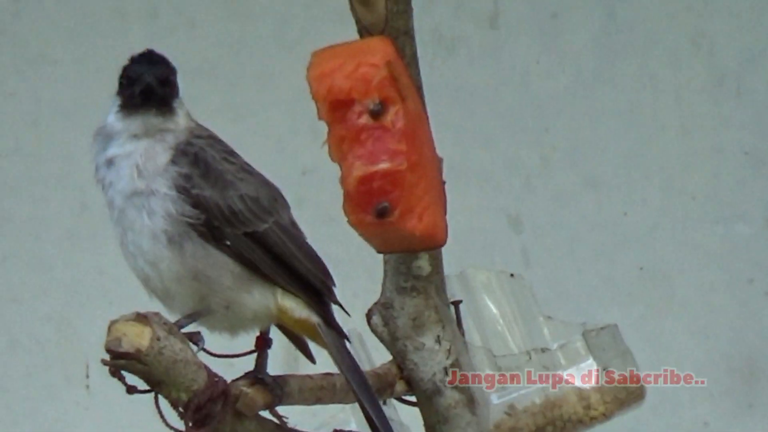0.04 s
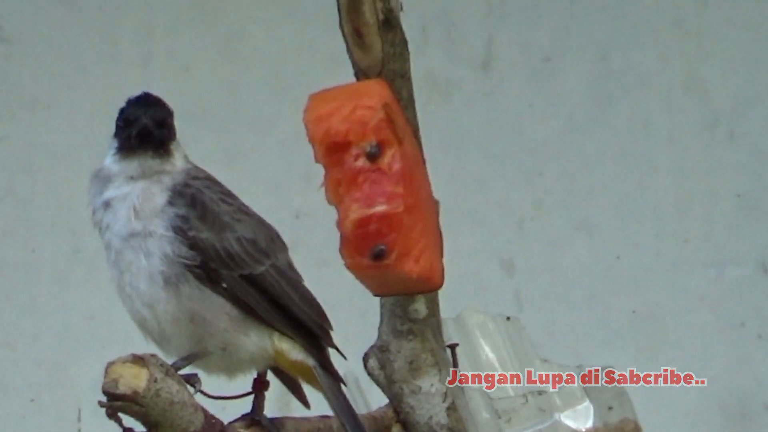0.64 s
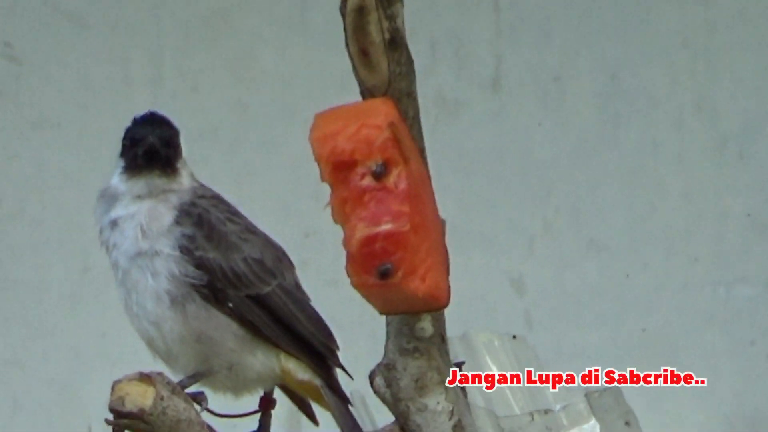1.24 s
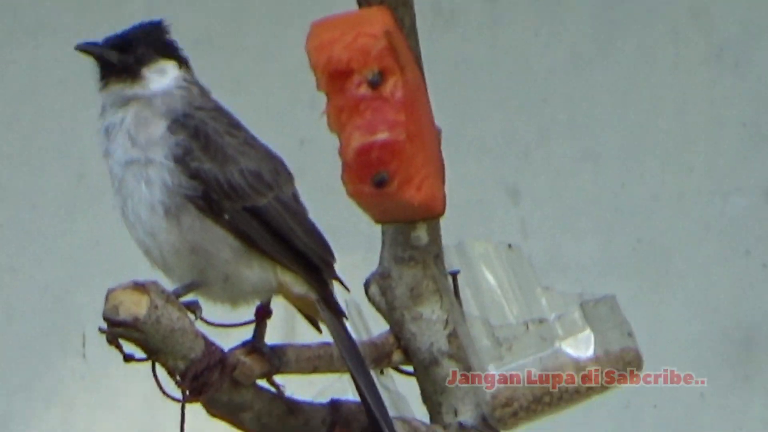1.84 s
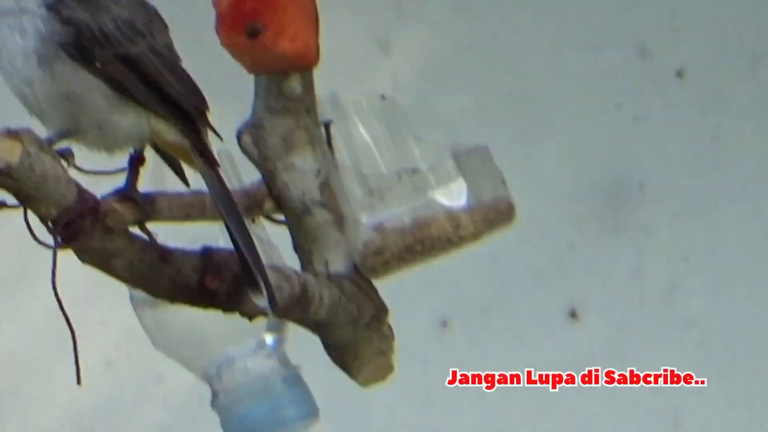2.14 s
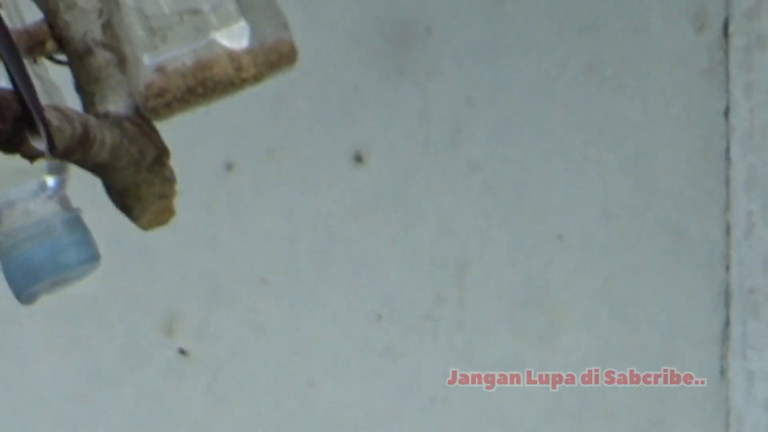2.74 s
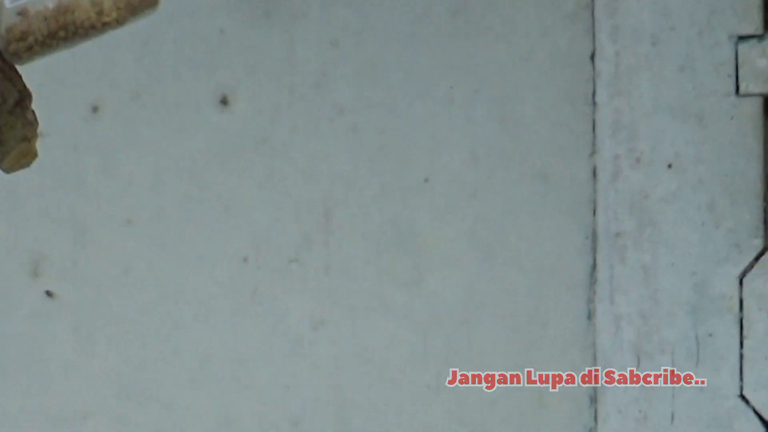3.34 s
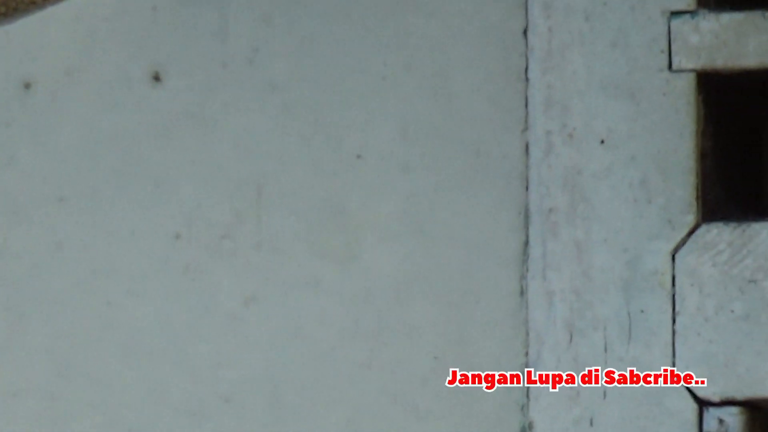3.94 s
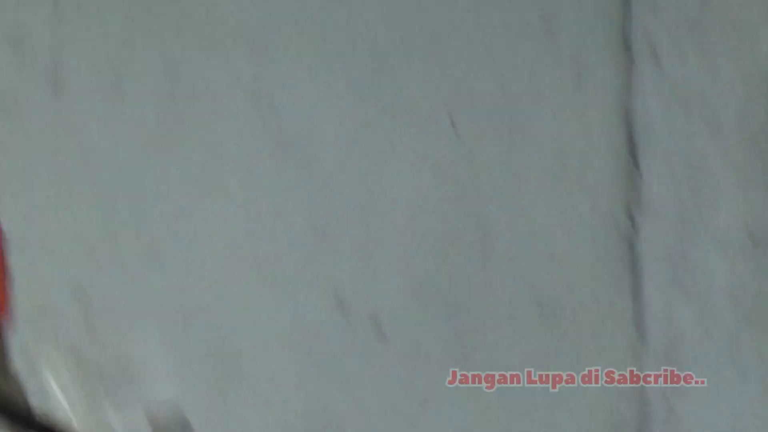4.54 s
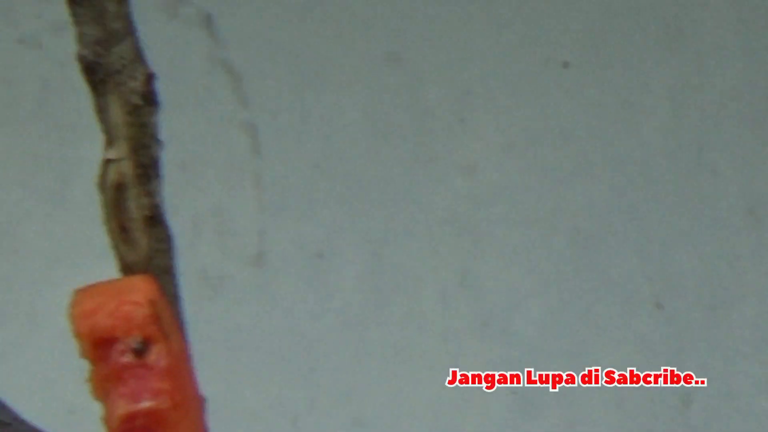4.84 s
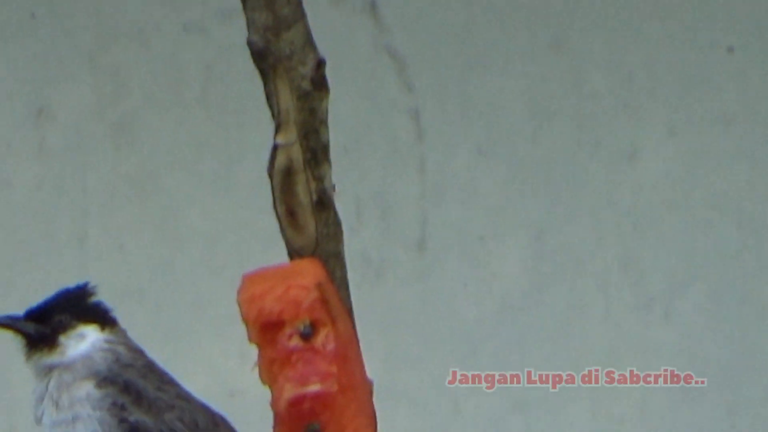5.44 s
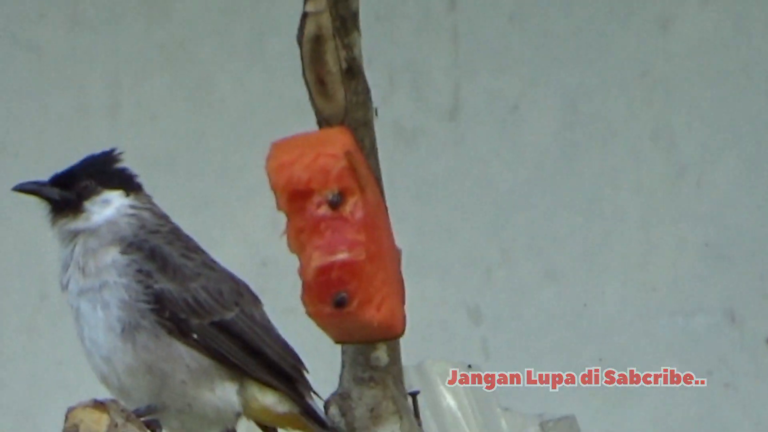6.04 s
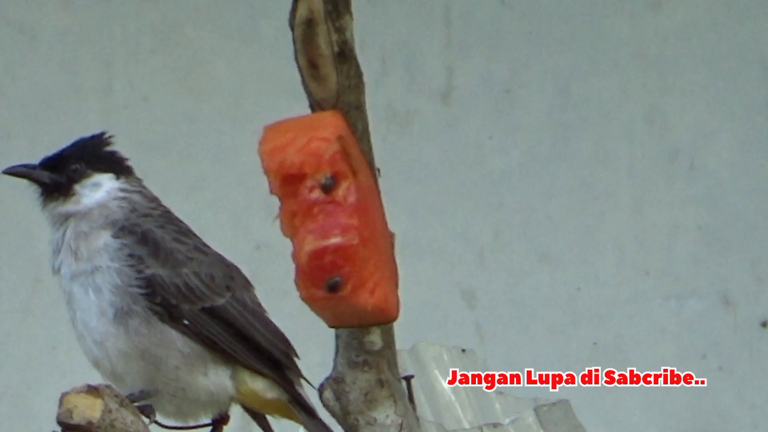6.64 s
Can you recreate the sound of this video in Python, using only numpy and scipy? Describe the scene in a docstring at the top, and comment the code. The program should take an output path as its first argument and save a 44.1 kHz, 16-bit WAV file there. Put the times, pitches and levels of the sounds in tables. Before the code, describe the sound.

A bulbul sings in a yard, so close that its loudest notes overload the microphone. It opens with a quick run of buzzes, chips and bubbly whistles, then gives shorter phrases, pauses for about two seconds and sings again. Dull hammer blows sound in the distance, and a second bird chirps faintly in the pause. Light wind bumps the microphone over a soft hush, a far motor and a thin high whine.

```python
"""Close bulbul in a yard

A bulbul sings short bubbly phrases, so close that it overloads the microphone. Its two-sided syrinx
gives whistles, trills and raspy chips; nearby walls throw them back. Behind it: distant hammering, a
second bird, a rustle, air buffeting the microphone, a far motor, a thin whine and outdoor hush."""
import sys
import numpy as np
from scipy import signal
from scipy.fft import rfft, irfft, next_fast_len
from scipy.io import wavfile
from scipy.ndimage import uniform_filter1d

SR = 44100
rng = np.random.default_rng(int(sys.argv[2]) if len(sys.argv) > 2 else 0)


def generate_wav(signal):
    """Clip the signal to [-1, 1] and save it as 16-bit WAV at the path in sys.argv[1]."""
    frames = np.transpose(np.atleast_2d(signal))
    scaled = np.clip(frames, -1, 1) * 32767
    pcm = np.round(scaled).astype(np.int16)
    wavfile.write(sys.argv[1], SR, pcm)


N = 295457
TIME = np.arange(N) / SR


def amp(db):
    """Decibels to gain."""
    return 10 ** (np.asarray(db) / 20)


def unit_rms(x):
    """Scales to rms 1."""
    return x / np.sqrt(np.mean(x ** 2) + 1e-20)


def follow(rows, t):
    """Every value column of a curve table at times t."""
    time_s, *columns = np.transpose(rows)
    return [np.interp(t, time_s, column) for column in columns]


def at_hz(points, hz):
    """Reads a spectrum on a log-frequency axis."""
    freq_hz, value = np.transpose(points)
    return np.interp(np.log(hz + 1), np.log(freq_hz + 1), value)


def noise(spectrum, size):
    """Coloured noise, rms 1."""
    n = next_fast_len(size)
    gain = amp(at_hz(spectrum, np.fft.rfftfreq(n, 1 / SR)))
    return unit_rms(irfft(rfft(rng.standard_normal(n)) * gain, n)[:size])


def wander(rate_hz, size):
    """Smooth random drift, rms about 1."""
    n = next_fast_len(size + 4096)
    lowpass = np.exp(-(np.fft.rfftfreq(n, 1 / SR) / rate_hz) ** 2)
    return unit_rms(irfft(rfft(rng.standard_normal(n)) * lowpass, n))[:size]


def add(mix, start_s, sound):
    """Mixes a sound in at start_s."""
    part = mix[max(round(start_s * SR), 0):][:len(sound)]
    part += sound[:len(part)]


def gate(t, start_s, end_s, edge_s):
    """Soft-edged window."""
    return np.sin(np.pi / 2 * np.clip(np.minimum(t - start_s, end_s - t) / edge_s, 0, 1)) ** 2


def syllable(shape, start_s, length_s, pitch_hz, level_db):
    """Stretches and transposes a shape into a contour: time_s, pitch_hz, level_db."""
    return [(start_s + frac * length_s, pitch_hz * ratio, level_db + db) for frac, ratio, db in shape]


def syrinx(contour, trills, rough, grain_hz=650, jitter=0.05):
    """One note's oscillation; trills flutter the pitch, roughness shakes pitch and amplitude."""
    t = np.arange(contour[0][0], contour[-1][0], 1 / SR)
    hz, db = follow(contour, t)
    hz = uniform_filter1d(hz, size=130)  # muscles round the corners of a glide
    for start_s, end_s, flutter_hz, depth, trill_rough in trills:
        active = gate(t, start_s, end_s, 0.0022)
        hz = hz * (1 + depth * active * np.sin(2 * np.pi * flutter_hz * (t - start_s)))
        rough = rough + trill_rough * active
    hz = hz * (1 + jitter * rough * wander(grain_hz, len(t)))
    phase = 2 * np.pi * np.cumsum(hz) / SR
    shake = 1 + rough * (wander(grain_hz, len(t)) + 1j * wander(grain_hz, len(t)))
    envelope = amp(db) * shake * gate(t, t[0], t[-1], 0.0011)
    return t, hz, phase, envelope


# buzz contour: length_frac, pitch_ratio, gain_db
BUZZ_SHAPE = [(0, 1.03, -30), (.15, 1, 0.5), (.76, 0.91, 0), (.88, 1.12, 0.5), (.93, 1.3, -9.5),
              (1, 1, -29)]
# buzzes: start_s, length_s, pitch_hz, level_db
BUZZES = [(0.028, 0.075, 2995, 1), (3.076, 0.085, 3010, 2), (5.991, .083, 2967, 3.5)]
FLUTTER_HZ = 241.7  # buzzes and rasps


def buzzes(depth=0.06, rough=0.25, flick_frac=0.73, flick_depth=0.2, flick_rough=0.5):
    """Fluttering tones that end in a wilder upward flick."""
    for start_s, length_s, hz, db in BUZZES:
        flick_s = start_s + flick_frac * length_s
        body = (start_s, flick_s + 0.009, FLUTTER_HZ, depth, rough)
        flick = (flick_s, start_s + length_s, FLUTTER_HZ, flick_depth, flick_rough)
        yield syllable(BUZZ_SHAPE, start_s, length_s, hz, db), [body, flick]


# warble contour: length_frac, pitch_ratio, gain_db
WARBLE_SHAPE = [(0, .83, -25.5), (.035, 1, -2), (.08, 1.2, 1), (.14, .98, 5), (.22, .95, 1),
                (.27, .91, -3.5), (.35, 1.14, 4), (.39, 1.1, -2), (.48, 1.48, 0.5), (.53, 1.52, -8),
                (.585, 1.22, 5), (.71, 1.17, -4), (.755, 1, 2.5), (.865, 1.16, 2.5), (.925, 1, -12.5),
                (.97, 1.05, 0.5), (1, 1.2, -28)]
# warbles: start_s, length_s, pitch_hz, level_db, droop_frac, dip_db
WARBLES = [(.222, 0.19, 2416, 1, .15, 3), (3.283, 0.19, 2391, 3, .13, 7.5),
           (6.194, .198, 2347, 4.5, 0, 22.5)]


def warbles(flutter_hz=370, depth=0.11, rough=0.65):
    """Two low arches with a dip between, a cracking leap to the top, a last arch that may droop."""
    for start_s, length_s, hz, db, droop_frac, dip_db in WARBLES:
        time_s, pitch_hz, level_db = np.transpose(syllable(WARBLE_SHAPE, start_s, length_s, hz, db))
        progress = (time_s - start_s) / length_s
        pitch_hz = pitch_hz * (1 - droop_frac * np.interp(progress, (0.8, 0.92), (0, 1)))
        level_db = level_db - dip_db * np.interp(progress, (0.22, 0.27, 0.34), (0, 1, 0))
        crack = (start_s + 0.36 * length_s, start_s + 0.475 * length_s, flutter_hz, depth, rough)
        yield np.transpose([time_s, pitch_hz, level_db]), [crack]


# twitter contour: length_frac, pitch_ratio, gain_db
TWITTER_SHAPE = [(0, 0.73, -37), (.035, 1.06, -5.5), (.085, 1.15, -30), (.13, 1, -1.5), (.19, .74, -24),
                 (.28, .71, -22), (.36, .96, -7), (.44, 0.997, 2), (.49, .85, -28), (.545, 1.02, 0),
                 (.6, 1.189, -22), (.69, 1.02, -1), (.84, .98, -4.5), (1, .88, -24.5)]
# twitters: start_s, length_s, pitch_hz, level_db
TWITTERS = [(1.203, 0.16, 3844, -14.5), (1.58, .149, 3864, -3.5)]


def twitters(quiver_frac=0.72, flutter_hz=168, depth=0.037, rough=0.16):
    """Three soft high arches; the last quivers as it dies."""
    for start_s, length_s, hz, db in TWITTERS:
        quiver = (start_s + quiver_frac * length_s, start_s + length_s, flutter_hz, depth, rough)
        yield syllable(TWITTER_SHAPE, start_s, length_s, hz, db), [quiver]


# whistled notes: start_s, length_s, from_hz, to_hz, level_db, bow_frac, roughness
NOTES = [(0.365, 0.044, 3285, 3310, -6, -0.011, 0.15), (0.454, 0.076, 2714, 1483, -3, 0.016, 0.05),
         (0.533, 0.093, 2585, 3000, -4.5, 0.0084, 0.02), (0.824, .046, 3080, 3295, -4, -0.036, .1),
         (0.865, .037, 4110, 3270, -6.5, 0.089, 0.46), (0.893, 0.06, 3253, 3260, -6, 0.019, 0.05),
         (0.945, 0.045, 4010, 3820, -20.5, 0, 0.22), (0.992, 0.074, 2747, 1520, -3, -0.00062, 0.03),
         (1.074, 0.089, 2586, 2992, -4, 0.0027, 0), (1.459, 0.046, 3080, 3250, -22.5, 0.035, 0),
         (1.49, 0.056, 2970, 3360, -25.5, 0.016, 0.27), (2.188, 0.021, 1870, 1830, -18.5, 0.051, 0.1),
         (2.199, 0.029, 2647, 2536, -1, -.02, 0), (2.257, 0.045, 2506, 2520, -3, .1, 0),
         (2.293, 0.047, 2380, 3100, -14.5, .03, 0.54), (2.302, 0.04, 1258, 2400, -17, -0.037, 0.24),
         (2.332, .038, 2563, 2603, -3.5, 0.056, 0), (2.36, 0.024, 2440, 2500, -15.5, 0.004, 0),
         (5.643, .018, 1610, 1800, -21, 0.015, 0.05), (5.652, 0.021, 2580, 2380, -2, .04, 0),
         (5.667, 0.041, 2130, 1524, -3, -0.096, 0), (5.718, 0.025, 2675, 2730, -3, 0.02, 0.08),
         (5.739, 0.065, 3098, 2450, -4, 0.0044, 0), (5.784, 0.037, 2473, 2530, -3.5, -0.0044, 0)]


def plain_notes(scoop_s=0.009, drop_s=0.00724, db_per_octave=9.5, flutter_hz=175, depth_per_rough=0.084):
    """Scoop up, bowed glide, drop off; overlapping notes come from the two sides of the syrinx."""
    progress = np.linspace(0, 1, 7)
    for start_s, length_s, from_hz, to_hz, db, bow_frac, rough in NOTES:
        end_s = start_s + length_s
        time_s = start_s + scoop_s + progress * max(length_s - scoop_s - drop_s, 1 / SR)
        pitch_hz = (from_hz + progress * (to_hz - from_hz)) * (1 + bow_frac * np.sin(np.pi * progress))
        level_db = db + db_per_octave * np.log2(pitch_hz / from_hz)
        scoop = (start_s, 0.82 * from_hz, db - 15)
        drop = (end_s, 0.919 * to_hz, level_db[-1] - 9.5)
        flutter = (start_s, end_s, flutter_hz, depth_per_rough * rough, rough)
        yield [scoop, *zip(time_s, pitch_hz, level_db), drop], [flutter]


# downward sweeps: start_s, length_s, from_hz, to_hz, level_db, flutter_frac
SWEEPS = [(0.187, 0.049, 5730, 2950, -2.5, 0.082), (0.326, .03, 4800, 3290, -2, 0.041),
          (.721, 0.052, 5490, 2970, -4.5, 0.082), (2.242, 0.02, 3600, 2160, -2.5, .01)]


def sweeps(peak_frac=0.44, flutter_hz=172, rough=0.16):
    """Steep, straight, fluttering falls, loudest near the middle."""
    for start_s, length_s, from_hz, to_hz, db, depth in SWEEPS:
        end_s = start_s + length_s
        peak = (start_s + peak_frac * length_s, from_hz + peak_frac * (to_hz - from_hz), db)
        flutter = (start_s + length_s / 5, end_s, flutter_hz, depth, rough)
        yield [(start_s, from_hz, db - 21), peak, (end_s, to_hz, db - 7)], [flutter]


# whistle overtone spectrum: freq_hz, gain_db
OVERTONES = [(2800, -21.5), (5000, -17.5), (6300, -21.5), (7500, -17), (9500, -13.5), (11500, -31),
             (13500, -40)]
# overtone strength by phrase: time_s, gain_db
BRIGHTNESS = [(.35, 0), (.5, 1), (1.15, -2), (1.6, -8), (2.3, -1.5), (3.3, -8), (5.5, -9), (5.8, 0),
              (6, -9.5)]


def whistled_voice(hiss_db=-31, rough=0.023, unsteady_db=3):
    """Nearly pure syrinx tones with unsteady overtones and a little turbulence."""
    out = np.zeros(N)
    for contour, trills in (*buzzes(), *warbles(), *twitters(), *plain_notes(), *sweeps()):
        t, hz, phase, envelope = syrinx(contour, trills, rough)
        brightness_db = follow(BRIGHTNESS, t)[0]
        tone = np.exp(1j * phase)
        for order, order_db in ((2, -7), (3, 0), (4, -10), (5, -3)):
            db = at_hz(OVERTONES, order * hz) + brightness_db + order_db
            tone += amp(db + unsteady_db * wander(60, len(t))) * np.exp(1j * order * phase)
        hiss = amp(hiss_db) * abs(envelope) * noise(THROAT, len(t))
        add(out, t[0], (envelope * tone).imag + hiss)
    return out


# chip contour: length_frac, pitch_ratio, gain_db
CHIP_SHAPE = [(0, .58, -25.5), (.3, .77, -5), (.5, 1, -3.5), (.76, 0.97, -3), (1, .95, -32.5)]
# chips: start_s, length_s, pitch_hz, level_db
CHIPS = [(0.142, 0.034, 2197, 1.5), (2.1, 0.04, 1916, -3), (3.2, 0.037, 2153, 4),
         (5.586, 0.045, 1842, -2.5), (6.113, 0.037, 2115, 1.5)]


def chips():
    """Quick climbs without flutter. The main phrase is buzz, chip, warble."""
    return [(syllable(CHIP_SHAPE, *row), []) for row in CHIPS]


# rasp contour: length_frac, pitch_ratio, gain_db
RASP_SHAPE = [(0, 0.55, -25), (.12, 0.56, 0.5), (.35, .88, -0.5), (.62, 0.96, 0), (.88, .95, -2),
              (1, .9, -15)]
# rasps: start_s, length_s, pitch_hz, level_db, flutter_frac
RASPS = [(1.982, 0.074, 2290, -6, .11), (5.465, 0.072, 2262, -8.5, 0.068)]


def rasps(rough=0.15):
    """Longer chips that flutter from end to end."""
    for start_s, length_s, hz, db, depth in RASPS:
        flutter = (start_s, start_s + length_s, FLUTTER_HZ, depth, rough)
        yield syllable(RASP_SHAPE, start_s, length_s, hz, db), [flutter]


# throat and beak response: freq_hz, gain_db
THROAT = [(1200, -12), (2000, -10), (2900, 3), (4600, -3), (5700, -25.5), (10000, -18.5), (14000, -43)]


def hoarse_voice(clearing_s=0.0072, hiss_db=-23, rough=0.17):
    """A harmonic stack through the throat; each note starts hoarse, then clears."""
    out = np.zeros(N)
    orders = np.arange(1, 7)[:, None]
    for contour, trills in (*chips(), *rasps()):
        start_s, end_s = contour[0][0], contour[-1][0]
        age_s = np.arange(start_s, end_s, 1 / SR) - start_s
        hoarseness = np.exp(-age_s / clearing_s)
        t, hz, phase, envelope = syrinx(contour, trills, rough + hoarseness)
        weights = amp(at_hz(THROAT, orders * hz))
        tone = (weights * np.exp(1j * orders * phase)).sum(0) / np.linalg.norm(weights, axis=0)
        hiss = amp(hiss_db) * abs(envelope) * (1 + 2 * hoarseness) * noise(THROAT, len(t))
        add(out, start_s, (envelope * tone).imag + hiss)
    return out


# head direction: time_s, left_minus_right_db
FACING = [(.35, 1), (.5, 3.7), (1.15, 3), (1.6, 2), (2.3, 2), (3.1, 0), (3.5, 0), (5.5, 2), (5.8, 3.3),
          (6, .3)]


def head_turns(song):
    """The stereo balance shifts as the bird turns its head."""
    return song * amp(follow(FACING, TIME)[0] * np.array([[0.5], [-0.5]]))


def near_echoes(song):
    """Single echoes off the ground and the wall behind the perch."""
    out = np.zeros(N)
    for delay_s, gain_db in ((0.0037, -24), (0.0079, -28), (0.0143, -32)):
        add(out, delay_s, amp(gain_db) * song)
    return out


# yard decay: freq_hz, t60_s
YARD_DECAY = [(300, 0.25), (1500, 0.45), (2600, 0.25), (4000, 0.38), (8000, 0.095), (15000, 0.016)]


def yard_reverb(x, spread=0.28, build_s=0.0036):
    """Diffuse wall reflections, each band dying at its own rate."""
    hz, t, bands = signal.stft(rng.standard_normal((2, SR // 2)), SR, nperseg=256)
    decay = amp(-60 * t / at_hz(YARD_DECAY, hz)[:, None])
    mid, side = signal.istft(bands * decay, SR, nperseg=256)[1]
    onset = np.minimum(np.arange(len(mid)) / SR / build_s, 1)
    tail = np.array([mid + spread * side, mid - spread * side]) * onset
    return signal.fftconvolve(x[None], tail / np.linalg.norm(tail[0]), axes=1)[:, :N]


# hammer blows: start_s, gain_db
BLOWS = [(1.42, -28), (1.832, -18.5), (2.663, -23.5), (3.078, -16), (3.501, -25), (3.927, -33),
         (4.357, -22), (4.759, -16.5), (5.157, -17.5), (6.435, -28)]
# blow spectrum: freq_hz, gain_db
BLOW_SPECTRUM = [(150, -24), (300, 1), (550, 4), (850, 0), (1400, -2), (2200, -21), (5000, -17.5),
                 (10000, -64)]


def hammer(level_db=-8, attack_s=0.0013, t60_s=0.12):
    """Dull distant blows, each a fast-dying noise burst."""
    out, t = np.zeros(N), np.arange(SR // 3) / SR
    envelope = amp(level_db - 60 * t / t60_s) * np.minimum(t / attack_s, 1)
    for start_s, gain_db in BLOWS:
        add(out, start_s, amp(gain_db) * envelope * noise(BLOW_SPECTRUM, len(t)))
    return out


# second bird's chirps: start_s, level_db
FAR_CHIRPS = [(4.059, -41.5), (4.149, -41.5), (4.365, -39.5), (4.495, -46), (4.771, -60), (4.98, -52)]


def far_bird(from_hz=1600, to_hz=2150, length_s=0.048):
    """Faint, hoarse, rising chirps."""
    out = np.zeros(N)
    for start_s, db in FAR_CHIRPS:
        contour = [(start_s, from_hz, db), (start_s + length_s, to_hz, db)]
        t, hz, phase, envelope = syrinx(contour, trills=[], rough=1)
        tone = sum(amp(at_hz(THROAT, k * hz)) * np.exp(1j * k * phase) for k in (1, 2, 3))
        add(out, start_s, (envelope * tone).imag * gate(t, start_s, t[-1], length_s / 2))
    return out


def rustle(level_db=-37, tick_db=-23):
    """A short rustle with one tick in it."""
    spectrum_hz_db = [(500, -48), (1100, -17.5), (3000, -22), (4200, -21), (6000, -29), (8500, -26),
                      (13000, -48)]
    body = amp(level_db) * gate(TIME, 2.1, 2.54, 0.0087)
    tick = amp(tick_db) * gate(TIME, 2.416, 2.421, 0.00012)
    return (body + tick) * noise(spectrum_hz_db, N)


# air puffs: peak_s, level_db
PUFFS = [(0.781, -21), (1.07, -9.5), (1.733, -13.5), (2.038, -21.5), (2.403, -10.5), (2.787, -24.5),
         (3.919, -18), (4.03, -14), (5.199, -23), (5.568, -10), (6.222, -12), (6.612, -31)]
# buffeting spectrum: freq_hz, gain_db
BUFFET_SPECTRUM = [(10, -15.5), (30, 4), (55, -3), (90, -9), (150, -28), (400, -60), (1000, -102)]


def buffeting(steady_db=-41, puff_hz=50, lumps_db=-10, lumps_s=0.042):
    """Air on the microphone: each puff is one pressure swing amid smaller lumps."""
    rumble_gain, swings = np.full(N, amp(steady_db)), np.zeros(N)
    for peak_s, db in PUFFS:
        cycles = (TIME - peak_s) * puff_hz
        swings += amp(db) * np.cos(2 * np.pi * cycles) * np.exp(-np.minimum(2 * cycles ** 2, 20))
        rumble_gain += amp(db + lumps_db) * np.exp(-abs(TIME - peak_s) / lumps_s)
    return swings + rumble_gain * noise(BUFFET_SPECTRUM, N)


# motor spectrum: freq_hz, gain_db
MOTOR_SPECTRUM = [(80, -48), (190, 1.5), (280, -2.5), (380, 1), (520, -11), (900, -51), (2000, -71)]


def motor(level_db=-45, firing_hz=34.05, fade_db_per_s=0.6):
    """A far motor, slowly fading: one low puff per firing."""
    cycles = firing_hz * TIME + 0.05 * wander(2.2, N)
    puffs = np.exp(-(cycles % 1) / 0.34) * noise(MOTOR_SPECTRUM, N)
    return amp(level_db - fade_db_per_s * TIME) * unit_rms(puffs)


# faint far tones: start_s, end_s, pitch_hz, level_db
THIN_TONES = [(4.65, 5.5, 3200, -52), (3.3, 4.1, 6280, -57), (4.75, 5.55, 11650, -57)]
# background levels: time_s, whine_db, hush_gain_db
BACKGROUND = [(0, -47, 11), (1, -48, 4.5), (1.4, -43, 3), (2.8, -49.5, -2), (4.2, -44.5, 0.5),
              (4.9, -41.5, 2.5), (5.8, -47, -0.5), (6.7, -45.5, -1)]


def whine(pitch_hz=4646, beat_hz=27, waver_hz=12):
    """Two close high tones beat into a thin pulsing whine; fainter tones come and go."""
    def tone(hz, db):
        phase = 2 * np.pi * np.cumsum(hz + waver_hz * wander(76, N)) / SR
        return amp(db + 2 * wander(40, N)) * np.sin(phase)
    whine_db = follow(BACKGROUND, TIME)[0]
    faint = sum(gate(TIME, start_s, end_s, 0.11) * tone(hz, db) for start_s, end_s, hz, db in THIN_TONES)
    return tone(pitch_hz, whine_db - 2) + tone(pitch_hz + beat_hz, whine_db - 1) + faint


# outdoor hush spectrum: freq_hz, gain_db
HUSH_SPECTRUM = [(60, -27), (130, -5.5), (370, -8.5), (700, -10.5), (1500, -11.5), (3000, -14), (4000, -20),
                 (6200, -17), (7600, -23.5), (10400, -12.5), (12500, -23), (15500, -49)]


def hush(level_db=-44.5, side_db=-16):
    """Outdoor hush and hiss, nearly mono."""
    side = amp(side_db) * noise(HUSH_SPECTRUM, N) * np.array([[1], [-1]])
    gain_db = follow(BACKGROUND, TIME)[1] + 0.5 * wander(3.4, N)
    return amp(level_db + gain_db) * (noise(HUSH_SPECTRUM, N) + side)


def scene(song_wet_db=-29, far_wet_db=-6):
    """The close bird over the sounds of the yard."""
    song = whistled_voice() + hoarse_voice()
    far = hammer() + far_bird()
    echoes = near_echoes(song) + yard_reverb(amp(song_wet_db) * song + amp(far_wet_db) * far)
    return head_turns(song) + echoes + far + hush() + rustle() + buffeting() + motor() + whine()


def record(dry, ceiling=0.82, cutoff_hz=15650):
    """The input stage clips the loud notes; a low-pass follows."""
    oversampled = signal.resample_poly(dry, 2, 1, axis=1)
    clipped = signal.resample_poly(np.clip(oversampled, -ceiling, ceiling), 1, 2, axis=1)
    lowpass = signal.firwin(511, cutoff_hz, window=("kaiser", 9), fs=SR)
    return signal.oaconvolve(clipped, lowpass[None], "same", axes=1)


dry = scene()
out = record(dry)
generate_wav(out)
```